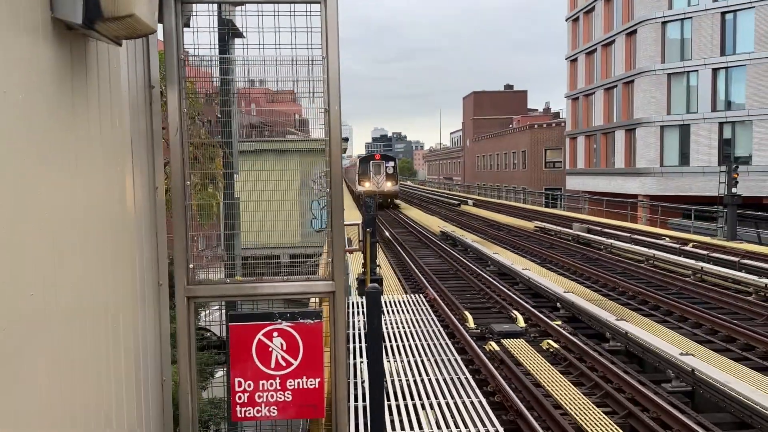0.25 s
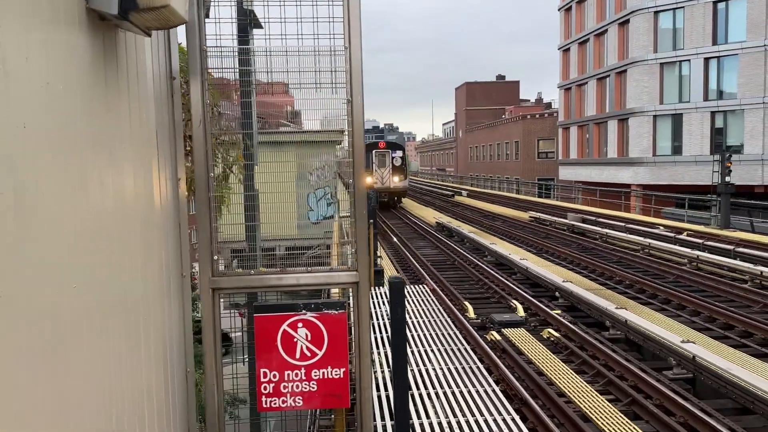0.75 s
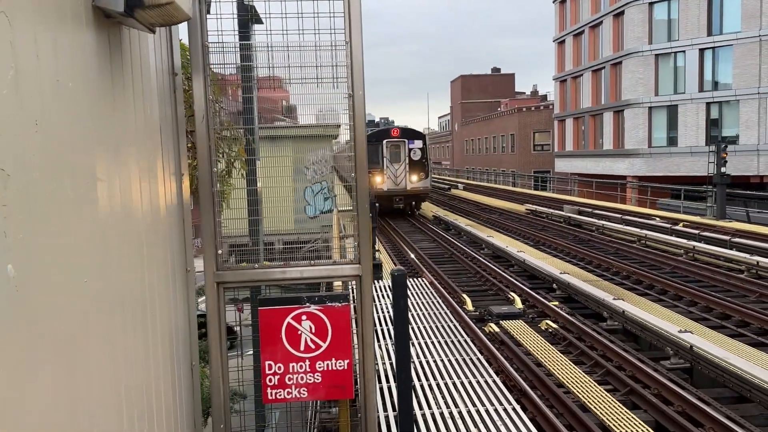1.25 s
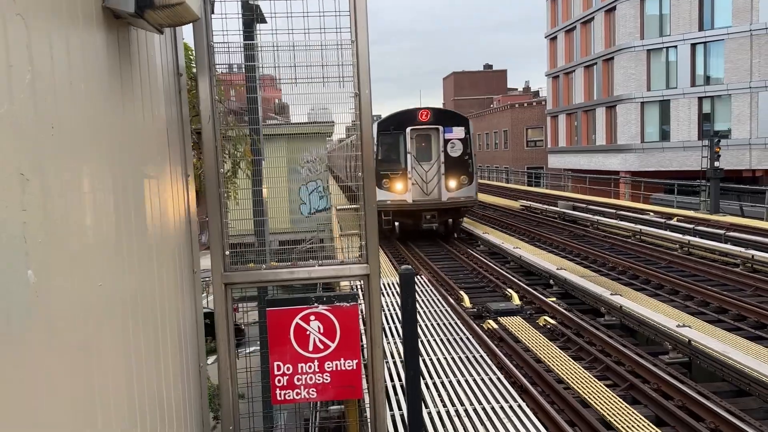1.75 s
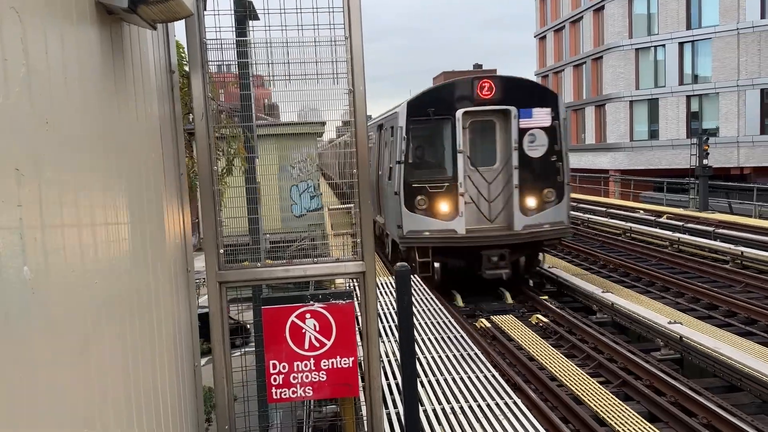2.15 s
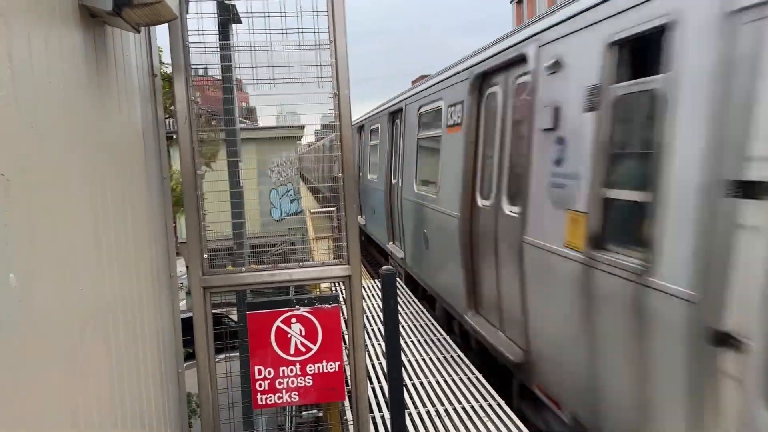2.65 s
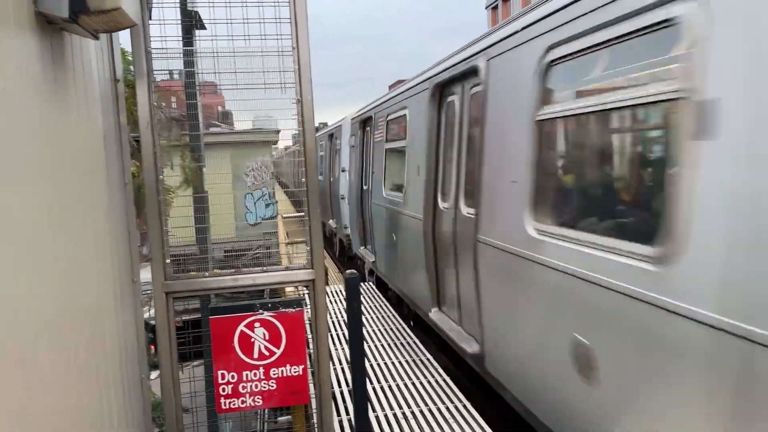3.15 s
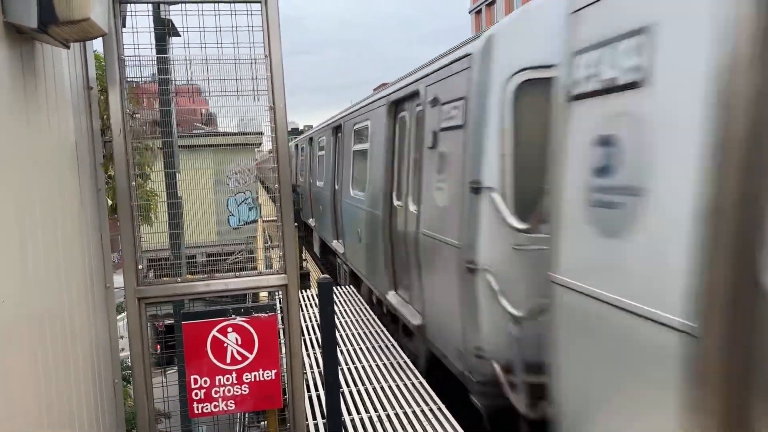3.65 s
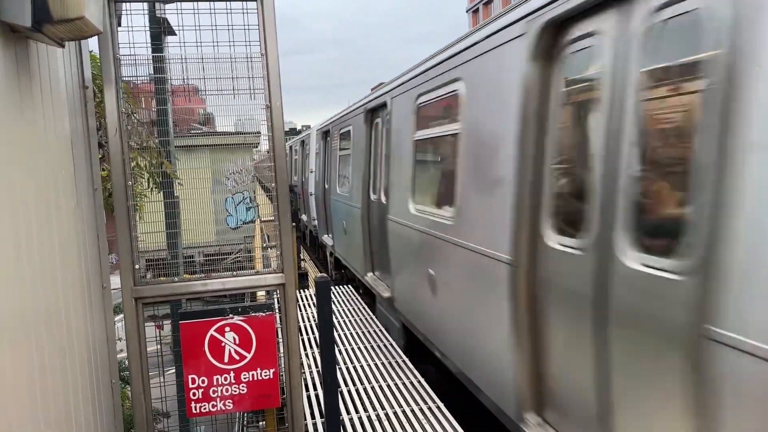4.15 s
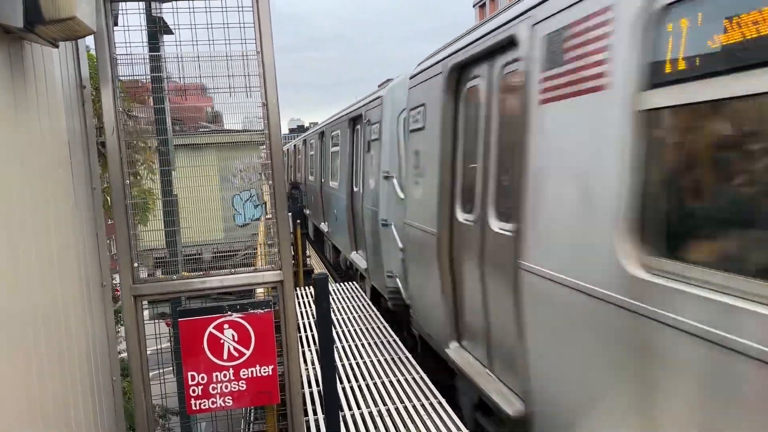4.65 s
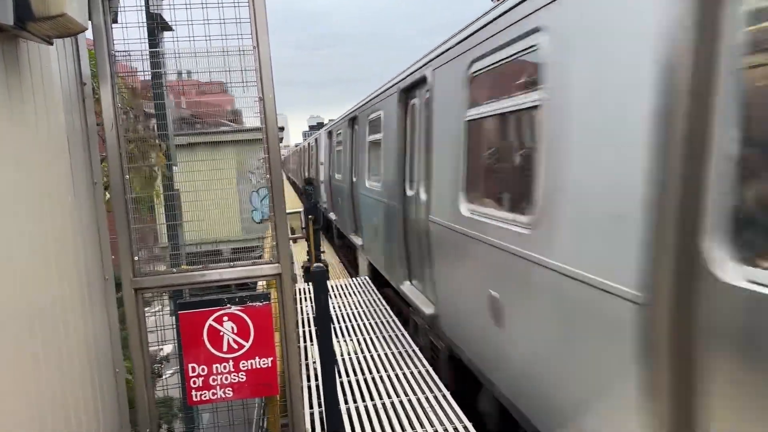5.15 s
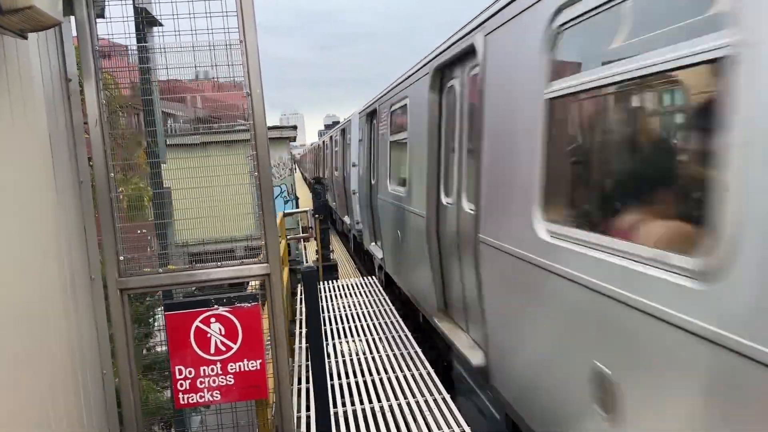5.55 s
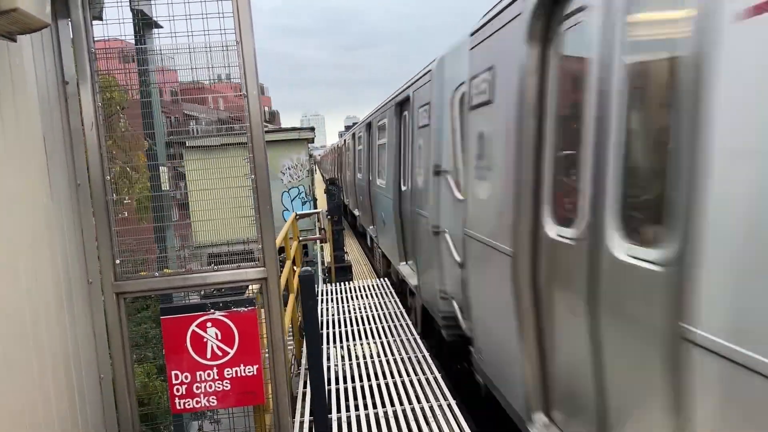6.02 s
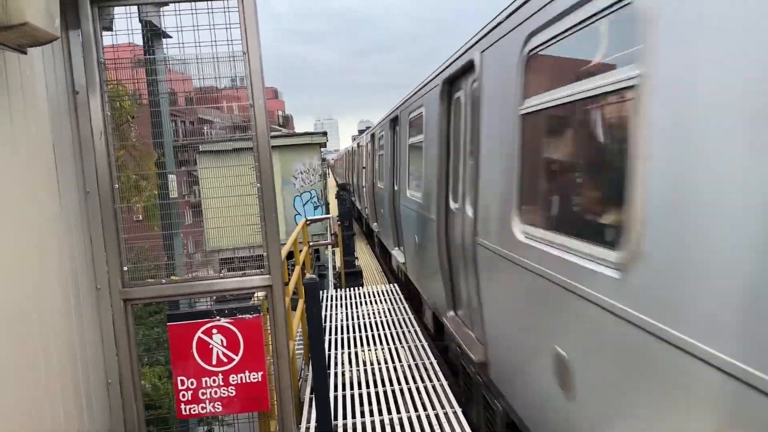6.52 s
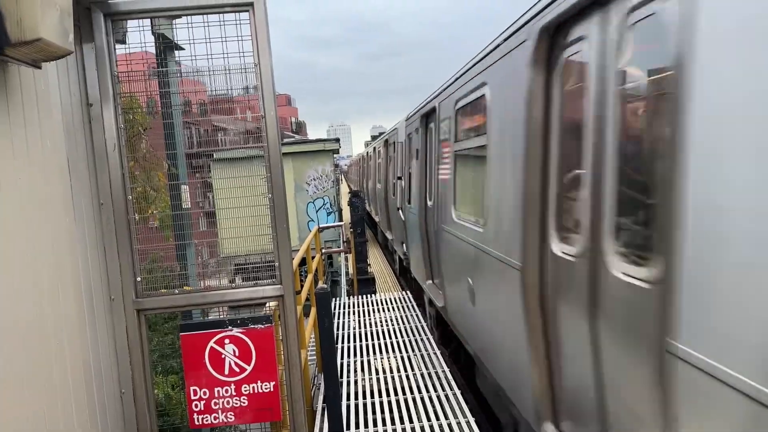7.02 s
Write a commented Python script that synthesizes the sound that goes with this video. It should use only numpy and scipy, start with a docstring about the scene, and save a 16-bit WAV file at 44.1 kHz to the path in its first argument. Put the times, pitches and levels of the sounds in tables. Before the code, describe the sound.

Growing steel rumble and knocking rail joints swell to a close train pass, with a burst of wind buffeting, then slower fading clatter and faint motor whine.

```python
"""Steel roars and knocks at once: a train rolls in on a viaduct, heard on a phone held at the platform end.
Rough wheels shake rails and girders as banded noise; axles knock over rail joints and ring wheel modes.
Decaying sines jolt the steelwork, flanges chirp in short wavering tones, and blurred motor tones whine.
The draught of the first car buffets the microphone ports with throbbing noise and slaps that sink in pitch;
after it the bass drops out for a moment."""
import sys
import numpy as np
from scipy import signal
from scipy.fft import rfft, irfft, next_fast_len
from scipy.io import wavfile
from scipy.ndimage import uniform_filter1d

SR = 44100
rng = np.random.default_rng(int(sys.argv[2]) if len(sys.argv) > 2 else 0)


def int16_out(signal):
    """Quantize to a 16-bit WAV file."""
    q = np.round(np.clip(np.atleast_2d(signal).T, -1, 1) * 32767)
    wavfile.write(sys.argv[1], SR, q.astype(np.int16))


N = 321048
TIME, FREQ = np.arange(N) / SR, np.fft.rfftfreq(next_fast_len(N), 1 / SR)
STEP = 8  # band gains are worked out every 8 samples
LEAD_S = 0.0006  # knock sounds start this many seconds before their row's time
ARRIVES_S = 2.62  # the first car reaches the platform end


def undb(db):
    """Decibels to amplitude."""
    return 10 ** (np.asarray(db) / 20)


def curve(table):
    """Columns of a table of rows (s, ..), joined by straight lines."""
    s, *columns = np.transpose(table)
    return [np.interp(TIME, s, c) for c in columns]


def shape(table, hz):
    """A (Hz, value) table read on a log frequency axis."""
    table_hz, values = np.transpose(table)
    return np.interp(np.log(hz), np.log(table_hz), values)


def blend(anchors_hz, controls, hz):
    """The two controls nearest to hz, mixed by log distance."""
    place = np.interp(np.log(hz), np.log(anchors_hz), np.arange(len(anchors_hz)))
    k = min(int(place), len(anchors_hz) - 2)
    return controls[k] * (1 + k - place) + controls[k + 1] * (place - k)


def walk(rate, size=N):
    """Random levels held 1 / rate s and smoothed twice, size points over the whole time; spread near 1."""
    k = int(SR * size / N / rate)
    held = np.repeat(rng.standard_normal(size // k + 1), k)
    return 1.3 * uniform_filter1d(uniform_filter1d(held, k), k)[:size]


def band(spectrum, hz):
    """One third-octave slice with soft skirts, rms 1."""
    skirt = np.cos(np.pi / 2 * np.clip(3 * np.log2(FREQ / hz + 1e-9), -1, 1))
    x = irfft(spectrum * skirt)[..., :N]
    return x / np.sqrt(np.mean(x ** 2))


def ring(x, hz, t60):
    """A decaying mode, peak near 1 for a unit click."""
    r, w = np.exp(-np.log(1000) / (t60 * SR)), 2 * np.pi * hz / SR
    return signal.lfilter([np.sin(w)], [1, -2 * r * np.cos(w), r * r], x)


def far(s):
    """Seconds until the train arrives; 0 after that."""
    return np.maximum(ARRIVES_S - s, 0)


def gate(span, edge_s):
    """1 inside the span, with short ramps."""
    return np.clip(np.minimum(TIME - span[0], span[1] - TIME) / edge_s, 0, 1)


# Motor whine while braking, one list per tone.
# Each row: time in seconds, centre pitch in Hz, level in dB before it breaks up.
MOTOR_TONES = [
    [(6.5, 1200, -46), (6.9, 1150, -47), (7.28, 1120, -54)],
    [(6.3, 1600, -52), (6.9, 1570, -49), (7.28, 1570, -47)],
]


def whine():
    """Thin motor tones, blurred by random pitch wander, fade in and break up."""
    out = 0
    for table in MOTOR_TONES:
        hz, db = curve(table)
        fade = np.clip((TIME - table[0][0]) / 0.12, 0, 1)
        breakup = walk(90)
        turns = np.cumsum(hz + 30 * walk(60)) / SR
        out = out + fade * undb(db) * breakup * np.sin(2 * np.pi * turns)
    return out


# Modes that wheel and rail share.
# Each row: nominal pitch in Hz, relative level in dB, nominal decay t60 in seconds.
WHEEL_MODES = [(450, -5, .08), (620, -8, .06), (1250, -14, .05), (1620, -14, .05), (2150, -10, .08),
               (2450, -6, .05), (2750, -7, .045), (3000, -11, .05), (3750, -15, .04), (4500, -15, .018),
               (4900, -15, .018), (6400, -15, .02)]
SCRAPE_DB, SCRAPES_PER_S = -9, 90  # level over the rail drone; plucks of each mode on each path


def scrapes(spread_db=4.0, longer=.8):
    """Small flaws in rail and tread pluck single wheel modes at random, following the rail drone's level."""
    out = 0
    for hz, db, t60 in WHEEL_MODES[2:]:
        hits = rng.random((2, N)) < SCRAPES_PER_S / SR
        plucks = hits * undb(db + spread_db * rng.standard_normal(N))
        out = out + ring(plucks, hz, longer * t60)
    drone_db = curve(ROLL)[1]
    return out / out.std() * undb(drone_db + SCRAPE_DB)


# Dull low jolts of girders and car bodies, among and under the knocks.
# Each row: start in seconds, level in dB before JOLT_DB, centre pitch in Hz, t60 in seconds.
JOLTS = [(0.273, -13, 363, 0.1), (0.449, -11, 695, 0.1), (0.63, -11, 358, 0.1), (0.799, -17, 443, 0.1),
         (0.927, -10, 333, 0.1), (1.239, -10, 300, 0.1), (1.447, -2, 339, 0.1), (1.538, -6, 347, 0.1),
         (1.558, -14, 277, 0.1), (1.918, -6, 442, 0.1), (2.05, -20, 393, 0.1), (2.325, -9, 299, 0.1),
         (2.729, -11, 458, 0.1), (2.814, -8, 484, 0.1), (2.877, -10, 412, 0.1), (2.94, -6, 460, 0.1),
         (3.643, -6, 495, 0.1), (3.937, -8.5, 404, 0.1), (4.073, -11, 463, 0.1), (4.511, -11, 650, 0.1),
         (4.583, -12, 401, 0.1), (4.713, -15, 463, 0.1), (4.739, -8, 708, 0.1), (4.844, -10, 401, 0.1),
         (4.919, -10, 290, 0.1), (5.089, -10, 405, 0.1), (5.217, -20, 410, 0.1), (5.595, -17, 294, 0.1),
         (5.783, -9.5, 565, 0.088), (5.945, -17, 503, 0.1), (5.985, -7, 490, 0.1), (6.055, -7.5, 450, 0.1),
         (6.114, -17, 509, 0.1), (6.399, -15, 464, 0.1), (6.479, -19, 423, 0.1), (6.541, -11, 468, 0.1),
         (6.853, -21, 390, 0.1)]
JOLT_DB, JOLT_RISE_S, JOLT_WAVER = -4, 0.0027, 0.099  # added level, rise time, relative pitch waver


def jolts():
    """Each jolt rings one low mode of the steelwork, swelling fast and wavering."""
    out, drift, start_turns = np.zeros((2, N)), walk(120), rng.random((len(JOLTS), 2, 1))
    for (s, db, hz, t60), start in zip(JOLTS, start_turns):
        i, t = int(s * SR), TIME[:SR // 6]
        turns = hz * np.cumsum(1 + JOLT_WAVER * drift[i:i + len(t)]) / SR + start
        swell = undb(db + JOLT_DB - 60 * t / t60) * (1 - np.exp(-t / JOLT_RISE_S))
        out[:, i:i + len(t)] += swell * np.sin(2 * np.pi * turns)
    return out


# Flange chirps.
# Each row: start in seconds, rms level in dB before flutter, centre pitch in Hz, decay scale in seconds.
CHIRPS = [(0.198, -43, 3760, 0.025), (0.663, -33, 2150, 0.022), (0.698, -38, 3900, .025),
          (0.838, -38, 2160, 0.028), (0.885, -34, 2154, 0.06), (1.203, -43, 3880, 0.053),
          (1.21, -49, 6700, .04), (1.235, -45, 2830, .04), (1.322, -32, 3720, 0.015),
          (1.324, -32, 2210, .015), (2.432, -39, 3680, .03), (2.442, -30.5, 11310, 0.033),
          (2.974, -44, 11260, 0.041), (3.246, -53, 11250, 0.05), (4.398, -51, 11300, 0.048),
          (6.658, -50, 11050, 0.032), (7.004, -52, 10950, 0.044)]


def chirps(waver=.009, flutter_db=7.0):
    """Stick-slip of a flange excites one wheel mode for a moment; it wavers and breaks up."""
    out, drift = np.zeros(N), walk(150)
    flutter = undb(flutter_db * (.5 - np.abs(walk(120))))
    for s, db, hz, length in CHIRPS:
        t = TIME[:int(2 * length * SR)]
        i = int(s * SR)
        turns = hz * np.cumsum(1 + waver * drift[i:i + len(t)]) / SR
        slip = np.sqrt(2) * np.sin(2 * np.pi * turns)
        out[i:i + len(t)] += undb(db) * slip * (1 - np.exp(-t / 0.0028)) * np.exp(-(t / length) ** 3)
    return out * flutter


# Rolling noise of the wheels as the train comes and passes, before band shares.
# Each row: time in seconds, girder roar in dB, rail drone in dB, wheel hiss in dB.
ROLL = [(0.0, -23.5, -33.5, -42.5), (.2, -25, -31, -41.5), (.45, -22.5, -31.5, -41),
        (.85, -22.5, -30.5, -39.5), (1.21, -22, -31, -41), (1.52, -20.5, -26.5, -30.5),
        (1.84, -18, -29, -39.5), (2.0, -22, -26, -40.5), (2.11, -16.5, -27.5, -33),
        (2.29, -20, -23.5, -31.5), (2.45, -19, -26, -33.5), (2.56, -16, -24, -31), (2.66, -28, -33.5, -38),
        (3.1, -20, -37.5, -43.5), (3.28, -24.5, -42, -45.5), (3.44, -21.5, -38, -40),
        (3.75, -22, -32, -38.5), (4.05, -25, -37.5, -44.5), (4.22, -25, -39, -44.5), (4.4, -26.5, -40, -45),
        (4.55, -27, -35, -40.5), (4.68, -25.5, -38, -40.5), (4.95, -26.5, -33.5, -42),
        (5.2, -27, -38.5, -44), (5.41, -28, -40.5, -49), (5.63, -33, -43.5, -46), (5.9, -28.5, -41, -44.5),
        (6.18, -23, -32.5, -41), (6.42, -27.5, -34.5, -43.5), (6.62, -31, -36, -48.5),
        (6.81, -31, -39, -51.5), (7.28, -27.5, -38.5, -45)]
# Deep rumble of the viaduct. Each row: time in seconds, level in dB.
RUMBLE = [(0.0, -26.5), (.5, -27.5), (.9, -25.5), (1.35, -27), (1.8, -23), (2.3, -19.5), (2.6, -25.5),
          (3.05, -28), (4.0, -31.5), (4.4, -33.5), (4.65, -28.5), (5.0, -34), (5.4, -31), (5.65, -27.5),
          (6.0, -34.5), (6.45, -32), (6.8, -34), (7.28, -32)]
# Boom, clang and ring lean from the mix of their neighbours as the train comes and passes.
# Each row: time in seconds, boom offset in dB, clang offset in dB, ring offset in dB.
LEAN = [(0, -4, -2.5, -7), (.5, -0.5, -1.5, -6), (1, -1, -2, -5), (1.4, 4.5, -.5, -6),
        (1.8, -2.5, -1.5, -2.5), (2.3, 1.5, 2.5, -7), (2.8, 2, 5, 1), (3.1, -3.5, -1, 2), (3.4, 2.5, 2, -2),
        (3.8, -4, -0.5, 0), (4.2, 0.5, -0.5, -2), (4.55, 4, 6, 1.5), (4.9, -3, 2, -.5),
        (5.35, -0.5, 2.5, 2.5), (5.8, 1, 2.5, 1), (6.4, -1.5, -1, -4), (6.8, -0.5, -3, -5),
        (7.28, -2, -3, -5)]
AIR_DB, AIR_FAR_DB_PER_S = -12, -4  # top air over hiss; distance dulls it


def roll_levels():
    """Levels of rumble, boom, roar, clang, drone, ring, hiss and air, from girders up to wheel treads."""
    roar, drone, hiss = curve(ROLL)
    rumble, = curve(RUMBLE)
    boom, clang, rings = curve(LEAN)
    air = hiss + AIR_DB + AIR_FAR_DB_PER_S * far(TIME)
    levels = [rumble, (rumble + 2 * roar) / 3 + boom, roar, (roar + drone) / 2 + clang, drone,
              (drone + hiss) / 2 + rings, hiss, air]
    return np.array(levels)[:, ::STEP]


# Axles over rail joints.
# Each row: time in seconds, nominal peak in dB, body over peak in dB, top over peak in dB before distance,
# the wheel's own low ring in Hz, its dB over peak, its high ring in Hz, its dB over peak.
# OWN_RING_DB is added to both own rings.
KNOCKS = [(0.184, -29.5, 0.5, -12, 1650, -9, 3760, -16), (0.6599, -27.5, -10, -13, 2500, -1, 3500, -4),
          (0.6985, -27, -2.5, -13, 2400, -7, 3880, -9), (0.774, -33.5, 6, -14, 2940, -6, 4150, -13),
          (0.82, -29, -5, -14, 3090, -8, 3940, -7), (0.8354, -23.5, -3, -18, 2190, -5, 3610, -4),
          (0.8894, -27, -16, -16, 2180, -6, 3920, -12), (0.9832, -29.5, -16, -18, 2870, -9, 3410, -7),
          (1.1, -31, -10, -14, 1910, -5, 4090, -11), (1.262, -32, -3, -14, 2710, -5, 3700, -12),
          (1.3109, -19.5, -8.5, -8, 4420, -9, 6450, -6.5), (1.3633, -20, -12, -12, 1950, -12, 3650, -10),
          (1.422, -28, 2, -6, 2470, -12, 4400, -7), (1.483, -16.5, -11, -17, 3350, -7, 4970, -12),
          (1.5494, -24, -16, -24, 2200, -2, 4620, -13), (1.6044, -23, -3, -14, 3140, -14, 3490, -10),
          (1.9137, -32.5, 12, -1, 2020, -1, 7140, -14), (1.9365, -24.5, -1, -7, 2200, -7, 7440, -11),
          (2.045, -36.5, 17, -5, 2200, -1, 3530, -13), (2.0887, -22, 5.5, -11, 2170, -5, 3370, -9),
          (2.14, -31, -4, -11, 1910, 3, 3700, -12), (2.208, -31, 9, -11, 2710, 1, 3380, -10),
          (2.33, -38.5, 19, -9, 2470, 2, 3460, 1), (2.416, -16, -5, -13.5, 2250, -8, 3470, -18),
          (2.434, -28, -3, -12, 2190, -3, 3650, -8), (2.538, -27.5, 8, -5, 3000, -14, 3420, -11),
          (2.592, -18, -6, -12.5, 1890, -14, 7460, -16), (2.7218, -27, 4, -11, 1970, -5, 3960, -14),
          (2.805, -22, 2.5, -12.5, 2680, -1, 4860, -10), (2.9293, -20, -3.5, -18, 1890, -9, 3610, -15),
          (3.219, -28, -1, -14, 2950, -11, 3870, -13), (3.284, -40.5, 17.5, -11, 2640, -7, 4150, -14),
          (3.33, -36.5, 13.5, -7, 2140, -6, 3400, -15), (3.409, -27, 0, -17, 2330, -9, 3640, -11),
          (3.5164, -33, 0, -11, 2220, -4, 4410, -11), (3.626, -23.5, -2.5, -14, 3050, -3, 4780, -5),
          (3.646, -41, 0, -13, 2410, 0, 4550, -6), (3.7045, -26.5, -9, -14, 2250, -8, 3660, -12),
          (3.756, -23, 0.5, -12, 2200, -9, 3960, -12), (3.839, -29.5, 3.5, -14, 2010, -1, 3460, -11),
          (3.932, -27.5, 1, -14, 2380, 0, 4870, -7), (4.0622, -24.5, -2.5, -14.5, 2380, -4, 4900, -10),
          (4.3733, -32, 3, -9, 3050, -9, 4350, -5), (4.5753, -28.5, -2.5, -14, 2350, -4, 3740, -15),
          (4.714, -32, 6.5, -11, 1930, -8, 3660, -12), (4.81, -24.5, -3, -12.5, 2180, -2, 4760, -6),
          (4.8993, -27.5, 1, -12, 2800, -10, 3520, -13), (4.9511, -23, -5, -18, 2130, -4, 4870, -10),
          (5.0422, -29.5, 4, -18, 2520, -5, 4980, -14), (5.137, -25.5, -3.5, -15.5, 2450, 1, 2970, -3),
          (5.2814, -26.5, -1.5, -12.5, 1960, -4, 4200, -19), (5.61, -33.5, 6, -9, 2640, -13, 5240, -20),
          (5.765, -33, 5, -10, 2190, -6, 4010, -15), (5.844, -32, 0, -17, 1930, -4, 3660, -8),
          (5.961, -36, 9, -5, 2150, -6, 3400, -14), (6.0, -34, 4, -15, 1910, -1, 3450, -8),
          (6.095, -24.5, -1.5, -10.5, 2480, 2, 6720, -20), (6.1856, -32.5, 7, -12, 2360, -5, 3870, -7),
          (6.2482, -25.5, 1, -12, 2920, -7, 4800, -17), (6.346, -31.5, 4.5, -11, 2930, -7, 6140, -14),
          (6.37, -36, 3.5, -16, 2230, 5, 3430, -12), (6.4543, -27, 0.5, -13, 2670, -2, 6130, -17),
          (6.6122, -28, 1.5, -16, 2580, -9, 4720, -14), (6.903, -41, 3.5, -13, 2890, -4, 4040, -11),
          (6.982, -34.5, 1.5, -11, 2730, -10, 4480, -13), (7.1432, -40, 8.5, -8, 2680, -7, 5420, -15),
          (7.228, -33, 4, -11, 1940, 1, 7470, -16)]
THUD_DB, TOP_FAR_DB_PER_S = 6, -4.5  # thud over body; top lost per second before arrival
KNOCK_T60_S = 0.29  # tail decay before each part's own pace
CLICK_DB, CLICK_S = 3.5, .002  # the first steel-on-steel click over each part's level, and its decay


def knock_levels(rise_s=0.0044, crack_s=0.007, tail_db=-5.0):
    """Levels of thud, body, peak and top of all knocks: a crack, then the structure and the street ring on."""
    power = np.full((4, N), 1e-14)
    pace = np.array([[.4], [.8], [1.05], [1.3]])  # lows build and fade slower, the top dies first
    for s, peak_db, body_db, top_db, *_ in KNOCKS:
        i = int((s - LEAD_S) * SR)
        t = TIME[:min(N - i, SR // 3)] * pace
        tail = np.exp(-t / crack_s) + undb(tail_db - 60 * t / KNOCK_T60_S)
        click = undb(CLICK_DB) * (1 - np.exp(-t / 0.00044)) * np.exp(-t / CLICK_S)
        fall = np.hypot((1 - np.exp(-t / rise_s)) * tail, click)
        top_db = top_db + TOP_FAR_DB_PER_S * far(s)
        part_db = peak_db + np.array([[body_db + THUD_DB], [body_db], [0], [top_db]])
        power[:, i:i + t.shape[1]] += (undb(part_db) * fall) ** 2
    return 10 * np.log10(power[:, ::STEP])


def rattle(per_s=70, spread_db=3.0, fade_s=0.014):
    """Loose plates and bolts tick at random: a gain that jumps and fades, rms 1."""
    hits = (rng.random(N) < per_s / SR) * undb(spread_db * rng.exponential(size=N))
    gain = 1 + 0.13 * signal.lfilter([1], [1, -np.exp(-1 / (fade_s * SR))], hits)
    return gain / np.sqrt(np.mean(gain ** 2))


BANDS = 25 * 2 ** (np.arange(29) / 3)  # third-octave centres (Hz)
# Where rumble, boom, roar, clang, drone, ring, hiss and air rule the spectrum, in Hz.
ROLL_CONTROL_HZ = [110, 200, 400, 800, 1400, 2500, 4500, 11000]
# Share of each band under those controls, then its top end. Each row: frequency in Hz, share in dB.
ROLL_SHARE = [(25, -41), (40, -11), (55, -1.5), (100, -6), (200, -8), (320, -7.5), (500, -7), (800, -2.5),
              (1000, -7), (1270, -6.5), (1600, -2), (2100, -5.5), (3200, -6), (5000, -7.5), (8000, -4),
              (9500, 4.5)]
ROLL_TOP = [(11000, -4), (13000, -23), (16000, -3.5)]
# Broad resonances of girders and rail. Each row: centre in Hz, width in Hz, boost in dB before band levelling.
GIRDERS = [(62.4, 61, 22), (293, 87, 1.5), (458, 210, 8.5), (656, 105, 5), (1001, 98, 7), (2076, 180, 6),
           (3040, 1100, 9)]
# Where thud, body, peak and top rule a knock, in Hz.
KNOCK_CONTROL_HZ = [500, 1400, 4500, 11000]
# Share of each band in a knock. Each row: frequency in Hz, share in dB.
KNOCK_SHARE = [(100, -20.5), (300, -11), (600, -6), (1400, -5), (2500, -6.5), (3500, -12), (4700, -10.5),
               (6000, -11.5), (8000, -5), (11000, 1.5), (16000, -17)]
# the bass drops out after the draught
BASS_GAP_S, BASS_GAP_DB, BASS_EDGE_S, BASS_GAP_HZ = (3.625, 4.36), -8, 0.016, 326


def rolling():
    """Rough wheels shake steel: two unrelated paths of rolling noise and knocks, band by band."""
    controls, knocks = roll_levels(), knock_levels()
    noise = rfft(rng.standard_normal((2, N)), next_fast_len(N))
    for hz, width, db in GIRDERS:
        noise = noise * undb(db / (1 + (2 * (FREQ - hz) / width) ** 2))
    out, ticks, sway = 0, rattle()[::STEP], walk(8.7, size=knocks.shape[1])
    gap_db = BASS_GAP_DB * gate(BASS_GAP_S, BASS_EDGE_S)
    for hz in BANDS:
        flicker = 0.62 * sway + 1.57 * walk(10, size=len(sway))
        bed_db = blend(ROLL_CONTROL_HZ, controls, hz) + shape(ROLL_SHARE + ROLL_TOP, hz) + flicker
        grain = ticks ** np.clip(hz / 2500, 0, 1)  # small parts tick most in the treble
        blow_db = blend(KNOCK_CONTROL_HZ, knocks, hz) + shape(KNOCK_SHARE, hz)
        level = np.hypot(grain * undb(bed_db), grain * undb(blow_db))
        bass_gap = undb(gap_db * np.clip(np.log2(BASS_GAP_HZ / hz) / 1.04, 0, 1))
        out = out + band(noise, hz) * bass_gap * np.repeat(level, STEP)[:N]
    return out


RING_DB, OWN_RING_DB = -2, 6  # added to the shared modes, and to a wheel's own two rings
OWN_T60_S = (0.043, 0.039)  # a wheel's own low and high ring
BOUNCES, BOUNCE_S, BOUNCE_DB = 3, .013, -6  # loose steel rattles on: count, mean gap, change each time


def wheels(scatter_db=4.0, detune=0.033):
    """Each knock strikes the modes with its own mix and bounces; no two wheels are tuned alike."""
    hz, db, t60 = np.transpose(WHEEL_MODES)[:, :, None]
    t60 = np.vstack([t60, np.array(OWN_T60_S)[:, None]])
    chance = rng.standard_normal((len(KNOCKS), 4, len(WHEEL_MODES) + 2, 1))
    gaps = BOUNCE_S * (.5 + rng.exponential(size=(len(KNOCKS), BOUNCES))) / 1.5
    lags = np.cumsum(gaps, axis=1)
    out = np.zeros((2, N + SR))
    t = TIME[:SR // 14]
    for knock, (tune, size, phase_a, phase_b), after in zip(KNOCKS, chance, lags):
        s, peak_db, body_db, _, low_hz, low_db, high_hz, high_db = knock
        i = int((s - LEAD_S) * SR)
        shared_db = RING_DB + (body_db + THUD_DB) * (hz < 1000) + db + scatter_db * size[:-2]
        mix_db = np.vstack([shared_db, [[low_db + OWN_RING_DB], [high_db + OWN_RING_DB]]])
        tuned = np.vstack([hz * (1 + detune * tune[:-2]), [[low_hz], [high_hz]]])
        build = 1 - np.exp(-t * tuned / 4.8)  # low modes build late
        fall = undb(peak_db + mix_db - 60 * t / t60) * build
        strike = np.array([np.sum(fall * np.sin(2 * np.pi * tuned * t + np.pi * p), axis=0)
                           for p in (phase_a, phase_b)])
        for k, lag in enumerate([0, *after]):
            j = i + int(lag * SR)
            out[:, j:j + len(t)] += undb(k * BOUNCE_DB) * strike
    return out[:, :N]


# The phone's two microphone ports.
# Each row: frequency in Hz, likeness from 0 to 1, left minus right gain in dB, phase of right in radians.
PORTS = [(0, 1, -2, -1.9), (110, 0.95, 0, 0), (200, 0.87, 2, 0), (300, 0.83, 1.4, 0), (445, 0.46, 1, 0),
         (574, 0, -1.5, 0.7), (834, 0.56, 0, -0.6), (1240, 0.45, -0.5, -1.8), (1840, 0.39, 1, -3),
         (2190, 0.54, 2.5, -5.5), (2970, 0.8, 1, -4.5), (4500, 0.43, -1.5, -5.5), (5800, 0.75, -3, -4.5),
         (6160, 0.63, -2, -5), (7560, 0.27, -3.5, -6.5), (8170, 1, -1, -8.5), (10160, 1, 0, -11),
         (11900, 0.54, 0, -14.5), (13800, 0.8, 0, -15), (16000, .93, 0, -19)]


def ports(paths):
    """The right port hears a share of the left's wave, shifted in phase, and the rest by another path."""
    hz, *columns = np.transpose(PORTS)
    alike, pan_db, phase = (np.interp(FREQ, hz, c) for c in columns)
    alike = np.clip(alike, 0, 1)
    a, b = rfft(paths, next_fast_len(N))
    right = alike * a * np.exp(1j * phase) + np.sqrt(1 - alike ** 2) * b
    return irfft(np.array([a * undb(pan_db / 2), right * undb(-pan_db / 2)]))[:, :N]


DRAUGHT_S = (3.078, 3.63)  # start and end
DRAUGHT_DB, DRAUGHT_DB_PER_S, DRAUGHT_EDGE_DB = -26, -17, -14.5  # base at the start, slope, edge over throb
EDDY_DB, EDDY_T60_S = -6, 0.37  # eddies behind each gust: level over its tabled level, decay


def draught(alike=0.2):
    """Eddies press on the ports: deep throbs with a rough edge, only partly shared, dying down."""
    noise = rng.standard_normal((3, N))
    noise = np.sqrt(alike) * noise[0] + np.sqrt(1 - alike) * noise[1:]
    throb = signal.sosfilt(signal.butter(2, [40, 150], "bandpass", fs=SR, output="sos"), noise)
    edge = signal.sosfilt(signal.butter(1, [220, 600], "bandpass", fs=SR, output="sos"), noise)
    edge = signal.sosfilt(signal.butter(2, 1200, fs=SR, output="sos"), edge)
    flow = undb(DRAUGHT_DB + DRAUGHT_DB_PER_S * (TIME - DRAUGHT_S[0]))
    for s, db, *_ in SLAPS:
        eddy = (TIME > s) * undb(db + EDDY_DB - 60 * np.abs(TIME - s) / EDDY_T60_S)
        flow = np.hypot(flow, eddy)
    flow = uniform_filter1d(flow, size=SR // 200)
    rough_throb = throb / throb.std() + undb(DRAUGHT_EDGE_DB) * edge / edge.std()
    return gate(DRAUGHT_S, 0.0096) * flow * undb(2.0 * walk(40)) * rough_throb


# Gusts that slap the microphone ports.
# Each row: row time in seconds, throb level in dB before panning, first pitch in Hz, settled throb in Hz,
# left minus right in dB, throb decay t60 in seconds.
SLAPS = [(3.079, -1, 447, 88.7, -2, 0.14), (3.113, -7.5, 502, 140, -6, 0.19),
         (3.154, -3, 415, 86, -4, 0.21), (3.205, -17, 150, 55, 7, .2), (3.263, -5.5, 332, 97.8, -1, 0.15),
         (3.282, -6, 301, 64.7, 7, 0.31), (3.335, -20, 604, 59.3, -5, .2), (3.355, -9, 450, 230, -3, 0.14),
         (3.395, -4.5, 376, 89.4, 4, 0.11), (3.422, -13, 232, 62.6, 10, 0.27),
         (3.474, -24, 290, 79, 5, .15), (3.549, -15, 210, 57.3, 0, .2)]
SLAP_EDGE_DB = -5  # rough edge against the throb, before its short envelope


def slaps(edge_s=0.0065, lag_s=0.00035, sink_s=0.00693):
    """A gust jolts the membranes: a sudden throb that sinks in pitch, with a short rough edge."""
    out = np.zeros((2, N))
    t = np.maximum(TIME[:SR // 5] - np.array([[0], [lag_s]]), 0)  # the gust reaches the right port later
    dull = signal.butter(1, [220, 650], "bandpass", fs=SR, output="sos")
    soft = signal.butter(2, 1700, fs=SR, output="sos")
    for s, db, first_hz, hz, pan_db, t60 in SLAPS:
        turns = hz * t + (first_hz - hz) * sink_s * (1 - np.exp(-t / sink_s))
        throb = np.sin(2 * np.pi * turns) * undb(-60 * t / t60)
        rough = signal.sosfilt(np.vstack([dull, soft]), rng.standard_normal(t.shape))
        rough = rough / rough.std() * np.exp(-t / edge_s) * (1 - np.exp(-t / 0.0016))
        i = int((s + 0.001995) * SR)  # the slap starts 2 ms after its row's time
        port_db = db + np.array([[pan_db], [-pan_db]]) / 2
        out[:, i:i + t.shape[1]] += undb(port_db) * (throb + undb(SLAP_EDGE_DB) * rough)
    return out


def scene():
    """The train reaches the ports through the air; draught and slaps press on them directly."""
    train = whine() + scrapes() + jolts() + chirps() + rolling() + wheels()
    return ports(train) + draught() + slaps()


TOP_HZ = 15950  # upper limit of the phone


def record(dry):
    """The phone drops the deepest bass, rounds the loudest peaks and cuts the top."""
    dry = signal.sosfilt(signal.butter(2, 28, "highpass", fs=SR, output="sos"), dry)
    rounded = dry / (1 + (dry / .97) ** 4) ** .25
    return signal.sosfilt(signal.ellip(10, .2, 80, TOP_HZ, fs=SR, output="sos"), rounded)


dry = scene()
out = record(dry)
int16_out(out)
```